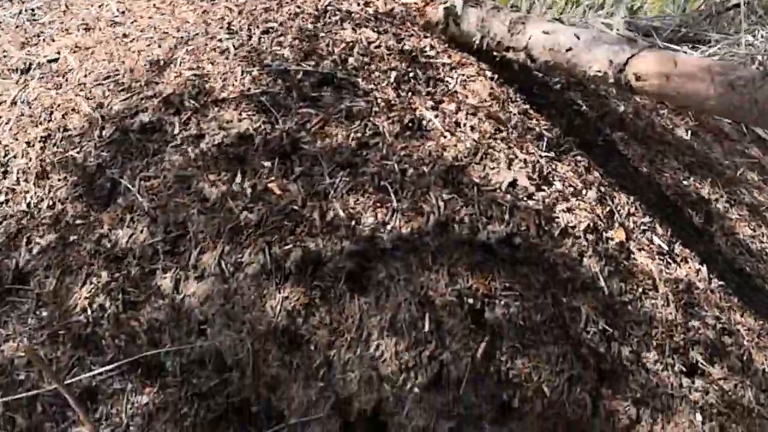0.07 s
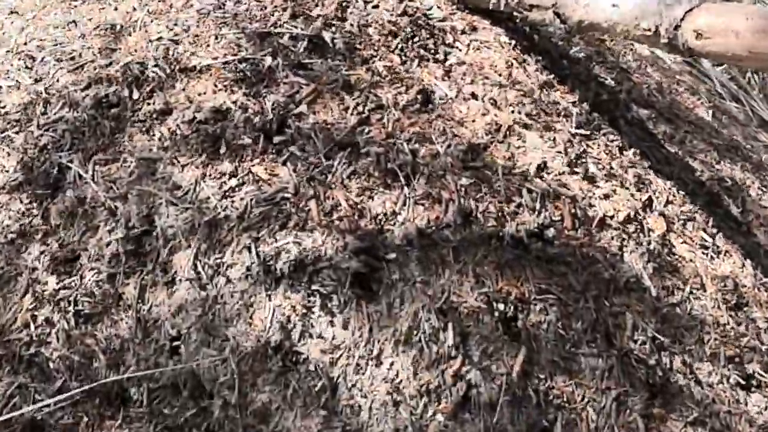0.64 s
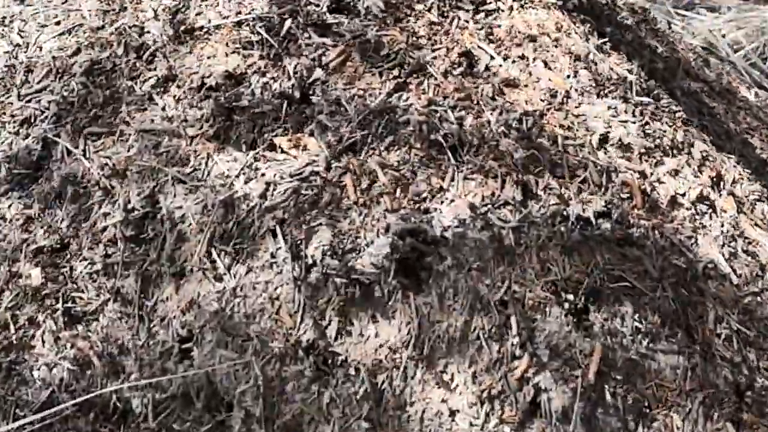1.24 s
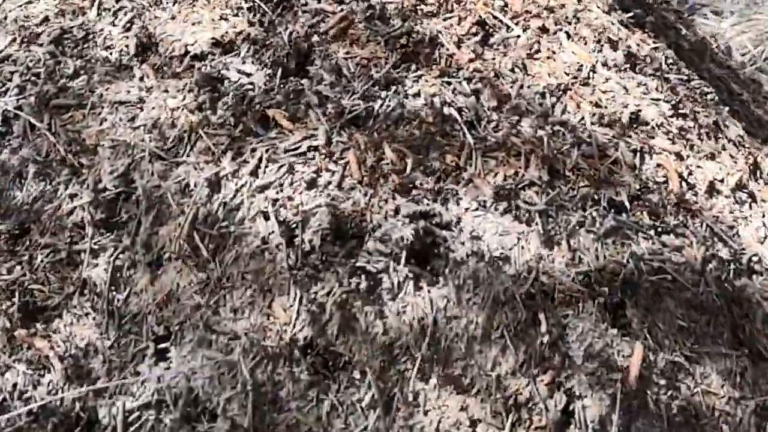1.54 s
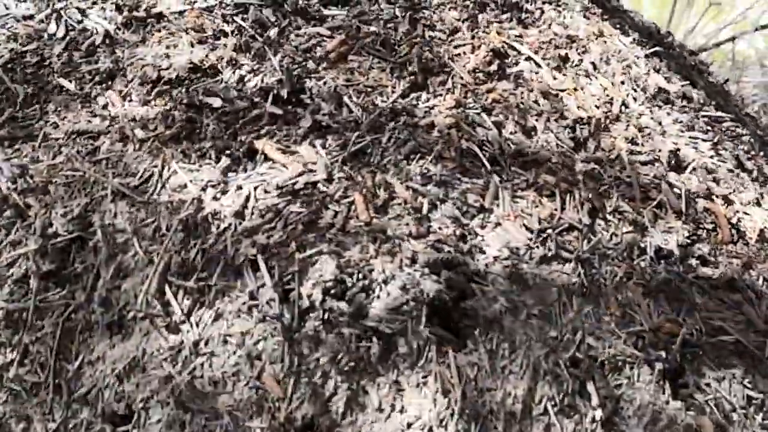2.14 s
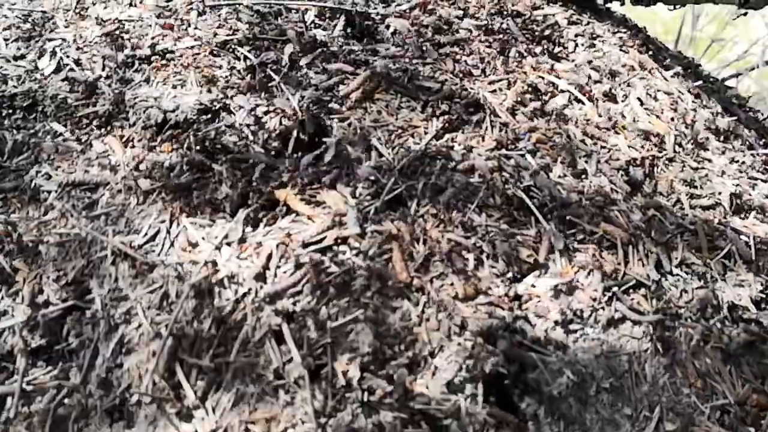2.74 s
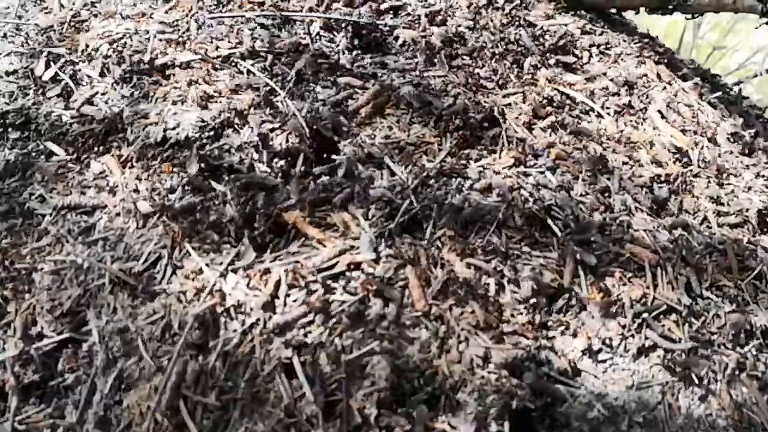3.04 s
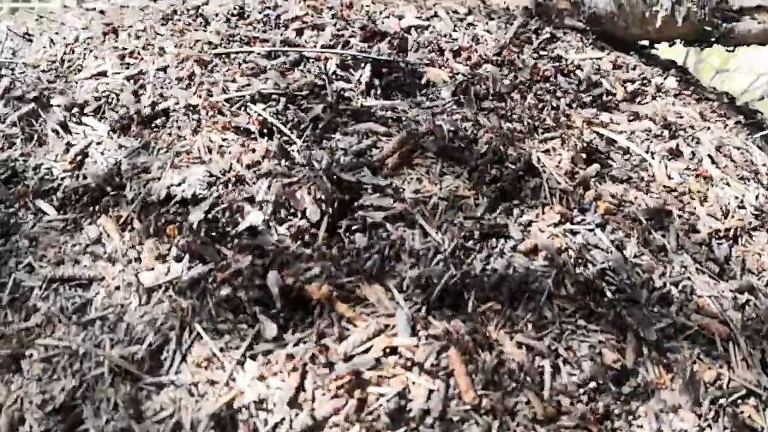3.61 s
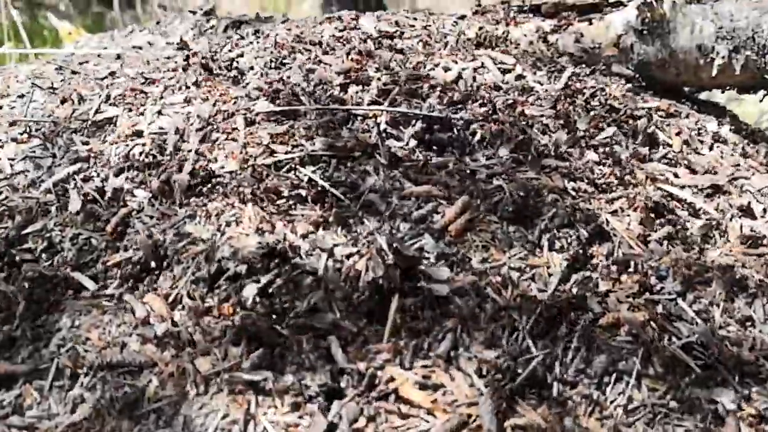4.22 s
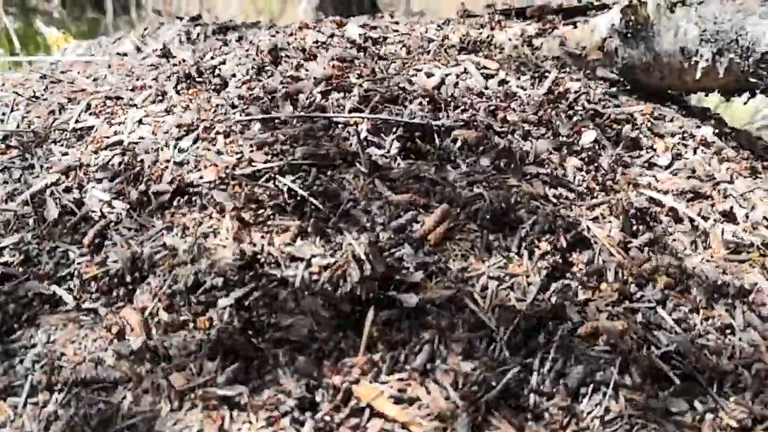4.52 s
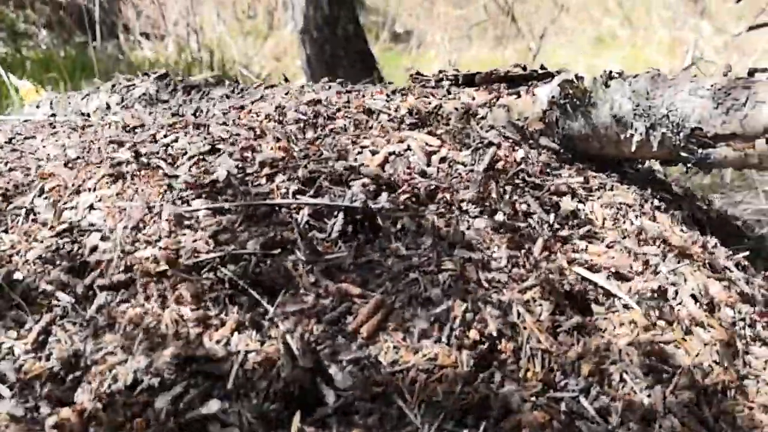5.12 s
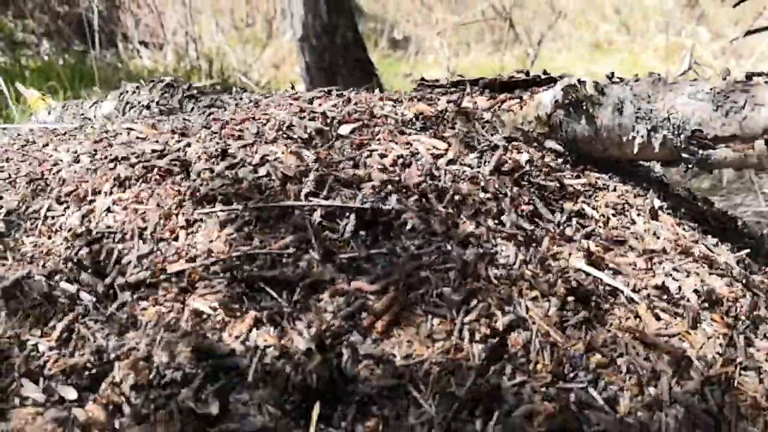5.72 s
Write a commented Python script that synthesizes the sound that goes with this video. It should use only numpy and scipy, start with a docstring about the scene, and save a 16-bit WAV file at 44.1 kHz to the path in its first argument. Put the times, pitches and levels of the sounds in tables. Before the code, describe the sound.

A soft gust rushes through forest treetops and slowly dies away. Close by, dry needles and bark crunch faintly in short bursts and thin twigs snap as weight shifts on the ground, mostly in the first half. One sharper crack comes later. The hand-held microphone adds a low rumble and soft finger bumps that cluster towards the end, over a steady distant hush.

```python
"""A gust rushes through forest tree crowns and dies away, heard on a hand-held two-port microphone
moving slowly over an anthill. Thin twigs snap and ring, and dry needles and bark crunch in short
bursts as weight shifts on the litter. The hand on the casing adds a low rumble, and slipping fingers
make soft bumps that cluster towards the end. The distant forest hushes underneath."""
import sys
import numpy as np
from scipy import signal
from scipy.fft import rfft, irfft
from scipy.io import wavfile
from scipy.ndimage import uniform_filter1d, map_coordinates

SR = 44100
rng = np.random.default_rng(int(sys.argv[2]) if len(sys.argv) > 2 else 0)


def unload_audio(sound):
    """Save the sound as a 16-bit wav file, at the path given as the first command line argument."""
    columns = np.transpose(np.atleast_2d(sound))
    # keep every value between -1 and 1, then stretch to whole-number steps
    steps = np.round(np.clip(columns, -1, 1) * 32767)
    wavfile.write(sys.argv[1], SR, steps.astype(np.int16))


N = 254016
TIME = np.arange(N) / SR
FREQ = np.maximum(np.arange(N // 2 + 1) * SR / N, 1)
TOP_HZ = 15700

# Finger slips on the casing. Each row: start in s, length in s, level in dB, contact time in ms.
FINGER_SLIPS = [(0.546, 0.011, -19.5, 5.9), (0.627, 0.035, -21.5, 2.54), (1.045, 0.0084, -26, 3.3),
                (1.461, .005, -20, 2.9), (1.68, 0.007, -22.5, 4.7), (1.857, 0.0046, -23.5, 4.2),
                (2.12, .05, -26.5, 2.5), (2.344, .006, -24.5, 4.2), (2.698, 0.059, -21, 3.9),
                (2.777, 0.044, -17, 2.26), (2.846, 0.042, -19, 3), (3.01, 0.014, -21, 3.2),
                (4.516, 0.021, -16, 4.7), (4.569, .01, -16, 3.5), (4.656, 0.0077, -18, 4.2),
                (4.711, .01, -15, 1.34), (4.755, 0.022, -23, 4.3), (4.885, 0.037, -15.5, 1.86),
                (5.013, 0.038, -16, 3.2), (5.076, 0.019, -13, 2.6), (5.346, .01, -17, 1.4),
                (5.369, 0.088, -25.5, 3.5), (5.493, 0.04, -13.5, 1.77), (5.599, .055, -15, 2.3)]


def wind(flutter_db=1.26, gain_db=1.0, lag_ms=.58):
    """Air rushes through the crowns all around; the nearest trees reach the left port first."""
    # Dying gust. Each row: time in s, level in dB, left minus right in dB.
    gust = [(0.0, -36.5, -2.5), (0.58, -40, -3), (1.07, -38, -4.5), (1.32, -36.5, -5), (1.52, -40.5, -5.5),
            (1.56, -38.5, -4.0), (2.23, -39.5, -4.5), (2.73, -42, -6.5), (2.82, -46, -4.5),
            (2.92, -43, -6.5), (3.27, -42.5, -4), (3.87, -49, -3), (5.29, -45.5, -1.5), (5.7, -51.5, -5.5),
            (5.76, -48.5, -10)]
    # Its passage through the nearest trees. Each row: time in s, level over the other crowns in dB.
    near_share = [(0, -6.5), (0.9, 0), (1.3, 3), (2.4, 3.5), (4.5, -4.5), (5.76, -10)]
    # Spectra of the nearest trees and the crowns around. Each row: frequency in Hz, gain in dB.
    near_spectrum = [(500, -22), (800, -11), (1200, -1.5), (1520, -0.5), (1850, -3), (2300, -11.5),
                     (3100, -29.5)]
    crown_spectrum = [(400, -22.5), (560, -13.5), (700, -7), (850, 1), (1050, -0.5), (1300, -3.5),
                      (1550, -3), (1900, -1.5), (2300, -6.5), (2700, -13), (3100, -26.5), (4000, -34)]
    level_db, pan_db = curves(gust)
    near_db, = curves(near_share)
    left = colour(rng.standard_normal(N), near_spectrum)
    right = map_coordinates(left, [np.arange(N) - lag_ms * SR / 1000], order=3, mode="reflect")
    near = unit(np.array([left, right])) * undb(near_db + flutter_db * walk(11.0))
    around = unit(colour(diffuse(), crown_spectrum)) * undb(flutter_db * walk(6.05))
    blend = (near + around) / np.hypot(1, undb(near_db))
    return blend * undb(level_db + gain_db) * pan(pan_db)


def twig_snaps(crack_db=7.0, splinter_db=-22, splinter_s=0.00063,
               ground_db=-42, ground_s=0.015, ring_db=-12):
    """A twig gives with one sharp crack, splinters and rings; the ground scatters a faint tail."""
    # Snaps. Each row: time in s, level in dB, ring offset in dB, pitch in Hz, left minus right in dB.
    snaps = [(0.3681, -30, -5, 7800, -6), (0.5233, -26.5, -10, 5200, -6), (0.9752, -43, 5, 5400, -3),
             (1.131, -44, 6, 4700, -6), (1.297, -30.5, -4, 8800, -11), (1.5822, -28, 7.5, 5000, -4),
             (1.7424, -28, -3, 4800, 0), (1.8228, -26.5, -6, 6630, -1), (2.0362, -25, -8, 8600, -5),
             (2.2414, -31, 0, 3220, -4), (2.6321, -27, -14, 7800, 2), (2.749, -19, -3, 13630, -1),
             (2.752, -17, -11, 8600, 2), (2.9167, -26, -12, 5430, -5), (2.9572, -28.5, 2, 6950, -2),
             (2.9986, -23.5, 3, 4540, 4), (3.0017, -20.5, -4, 4520, -16), (3.0453, -32, 1, 5570, 0),
             (3.273, -37, -9, 9500, 2), (3.3802, -40, -8, 13800, 0), (3.501, -39, -12, 7000, 0),
             (4.3034, -8.5, -23, 2280, 7), (4.4452, -38, -10, 7000, 4)]
    # Twig modes. Each row: multiple of the pitch, T60 in s, level in dB.
    modes = [(.72, 0.0054, 0.5), (1, 0.0091, 3), (1.16, 0.0036, 1), (2.05, 0.0054, -6)]
    # Crack spectrum. Each row: frequency in Hz, gain in dB.
    crack_spectrum = [(1200, -19), (2200, -7.5), (4000, -14), (6300, -16), (7600, -8.5), (9400, 1.5),
                      (10800, -3), (12000, -8), (14500, -15), (16000, -19)]
    cracks, rings = np.zeros((2, 2, N))
    t = TIME[:SR // 15]
    splinters = undb(splinter_db) * (t / splinter_s) * np.exp(1 - t / splinter_s)
    tail = splinters + undb(ground_db) * np.exp(-t / ground_s)
    for s, db, wood_db, hz, pan_db in snaps + small_twigs():
        crack = rng.standard_normal((2, len(t))) * tail
        crack[0, 0] = 1
        crack[1, max(int(pan_db // 2), 0)] = 1  # a twig on the left reaches the right port later
        ring = sum(undb(mode_db - 60 * t / t60_s)
                   * np.sin(2 * np.pi * (hz * multiple * t + rng.random((2, 1))))
                   for multiple, t60_s, mode_db in modes if hz * multiple < TOP_HZ)
        add(cracks, s, crack * undb(db + crack_db) * pan(pan_db))
        add(rings, s, ring * undb(db + wood_db + ring_db) * pan(pan_db))
    return colour(cracks, crack_spectrum) + rings


def small_twigs(count=14, over_load_db=18, scatter_db=2, wood_db=-4,
                ring_hz=6200, spread_octaves=0.39, pan_db=-1.5, pan_spread_db=3):
    """Thin twigs give at random, more often and louder under load; returns snap rows."""
    load_db = litter_load_db()
    summed_load = np.cumsum(undb(load_db / 2))
    times = np.interp(rng.random(count), summed_load / summed_load[-1], TIME)
    rows = []
    for s, (size, pitch, place) in zip(times, rng.standard_normal((count, 3))):
        db = np.interp(s, TIME, load_db) + over_load_db + scatter_db * size
        hz = ring_hz * 2 ** (spread_octaves * pitch)
        rows.append((s, db, wood_db, hz, pan_db + pan_spread_db * place))
    return rows


def litter_crunch(max_breaks_per_s=3000, spread_db=5.0, max_stalks_per_s=260, stalk_spread_db=6.0,
                  stalk_db=-3, grain_s=0.0015, gain_db=1.5):
    """Dry fragments break in one band per size, stalks in all bands; load makes more and louder breaks."""
    # Fragment sizes. Each row: band centre in Hz, width in octaves, level in dB.
    fragments = [(3360, 0.21, -1), (4940, 0.34, -2.5), (7920, 0.22, 0.5), (9250, 0.12, 3),
                 (11000, 0.13, -6), (13700, 0.13, -9.5)]
    load_db = litter_load_db()
    activity = undb((load_db - load_db.max()) / 4) / SR
    stalks = breaks(max_stalks_per_s * activity, stalk_spread_db) * undb(stalk_db) ** 2
    spectrum = 0
    for hz, octaves, db in fragments:
        impulses = breaks(max_breaks_per_s * activity, spread_db) + stalks + 1e-18
        energy = signal.lfilter([1], [1, -np.exp(-1 / (grain_s * SR))], impulses)
        grains = rng.standard_normal((2, N)) * np.sqrt(energy)  # one tiny noise burst per break
        band = np.exp(-(np.log2(FREQ / hz) / octaves) ** 2 / 2)
        spectrum = spectrum + rfft(grains) * undb(db) * band
    return unit(irfft(spectrum, N)) * undb(load_db + gain_db)


def breaks(chance, spread_db):
    """Energy of random breaks, mostly tiny, now and then large; mean 1."""
    hits = rng.random(N) < chance
    size = undb(spread_db * np.minimum(rng.exponential(size=N), 5))
    energy = hits * size ** 2 / chance
    return energy / energy.mean()


def litter_load_db(attack_s=0.049, release_s=0.027, settle_db=-10, settle_s=.3):
    """Each press builds, holds and lets go, then the litter settles."""
    # Presses of weight on the litter. Each row: start in s, length in s, level in dB.
    presses = [(0.298, .18, -56.5), (0.551, 0.064, -58.5), (0.718, 0.036, -65), (0.894, 0.22, -63),
               (1.253, 0.088, -57.5), (1.588, .16, -53.5), (1.841, .05, -56.5), (2.01, 0.037, -62.5),
               (2.153, .1, -54.5), (2.523, 0.13, -56), (2.735, .07, -55.5), (2.909, .13, -53),
               (3.098, 0.023, -59), (3.522, .12, -67), (4.022, .22, -66)]
    power = 0
    for s, length_s, db in presses:
        press = swell(s, length_s, attack_s, release_s)
        settling = undb(settle_db) * swell(s, length_s, attack_s, settle_s)
        power = power + undb(db) ** 2 * (press ** 2 + settling ** 2)
    return 10 * np.log10(power)


def finger_bumps(push_db=4.5, casing_hz=72, casing_q=0.95, scuff_db=-19, scuff_s=0.012, lag_s=.0009):
    """A soft push rebounds in the casing with a dull scuff of skin; it reaches the left port late."""
    # Spectrum of skin on the casing. Each row: frequency in Hz, gain in dB.
    scuff_spectrum = [(110, -7), (200, 2), (290, -6.5), (460, -14)]
    pushes, contact = np.zeros((2, N))
    t = TIME[:SR // 12] - 1 / 25  # zero at the centre of the push
    for s, db, contact_ms in stick_slip():
        add(pushes, s + t[0], undb(db + push_db) / np.cosh(2 * t * 1000 / contact_ms))
        add(contact, s + t[0], undb(db + scuff_db) * (3 / contact_ms) * np.exp(-(t / scuff_s) ** 2))
    w = 1j * FREQ / casing_hz
    rebound = rfft(pushes) * w ** 2 / (w ** 2 + w / casing_q + 1)  # resonant high-pass
    scuff = rfft(contact * unit(colour(rng.standard_normal(N), scuff_spectrum)))
    lowpass_hz = scuff_spectrum[-1][0]
    right = (rebound + scuff) / np.sqrt(1 + (FREQ / lowpass_hz) ** 8)
    left = right * np.exp(-2j * np.pi * FREQ * lag_s)
    return irfft(np.array([left, right]), N)


def stick_slip(max_bumps=8, gap_s=.02, jitter=.12, scatter_db=1.5):
    """A slipping finger catches repeatedly. Each row: time in s, level in dB, contact time in ms."""
    rows = []
    for start_s, length_s, db, contact_ms in FINGER_SLIPS:
        s = start_s
        for gap, size in rng.standard_normal((max_bumps, 2)):
            if s <= start_s + length_s:
                rows.append((s, db + scatter_db * size, contact_ms))
            s += gap_s * np.exp(jitter * gap)
    return rows


def grip_rumble(slip_db=-14, attack_s=0.039, release_s=0.041, uneven_db=0.5, side_db=-12, side_hz=110):
    """The grip rumbles, more around each slip; the casing moves whole in deep bass, flexes higher up."""
    # Hand at rest on the casing. Each row: time in s, level in dB.
    hold = [(0, -42), (2.9, -38.5), (3.4, -46.5), (4.2, -43), (5.76, -36)]
    # Casing spectrum. Each row: frequency in Hz, gain in dB.
    casing_spectrum = [(20, -14.5), (45, 1), (75, 1), (130, -4.5), (200, -13.5), (290, -25), (400, -34)]
    hold_db, = curves(hold)
    slip_power = sum((undb(db + slip_db) * swell(s, length_s, attack_s, release_s)) ** 2
                     for s, length_s, db, _ in FINGER_SLIPS)
    envelope = np.sqrt(undb(hold_db) ** 2 + slip_power)
    mid, side = unit(colour(rng.standard_normal((2, N)), casing_spectrum))
    side = irfft(rfft(side) * np.minimum(FREQ / side_hz, 3), N) * undb(side_db)
    return np.array([mid + side, mid - side]) * envelope * undb(uneven_db * walk(24.45))


def forest_hush(level_db=-47, sway_db=.4):
    """Steady hush of the distant forest, swaying very slightly."""
    # Still-air spectrum. Each row: frequency in Hz, gain in dB.
    hush_spectrum = [(88, -25), (150, -4.5), (217, -5.5), (414, -15), (578, -14.5), (821, -6.5),
                     (1060, -6.5), (1310, -16), (1870, -9), (3100, -22), (3920, -23.5), (4580, -30),
                     (9260, -39), (14500, -51), (16000, -67)]
    envelope = undb(level_db + sway_db * walk(3))
    return unit(colour(diffuse(), hush_spectrum)) * envelope


def diffuse(port_gap_m=0.32):
    """White noise from all sides at two spaced ports: alike in the bass, unrelated in the treble."""
    coherence = np.sinc(2 * FREQ * port_gap_m / 343)
    mid, side = rfft(rng.standard_normal((2, N))) * np.sqrt([1 + coherence, 1 - coherence])
    return unit(irfft(np.array([mid + side, mid - side]), N))


def colour(x, points):
    """Minimum-phase filter with the given spectrum, falling 24 dB per octave just beyond its ends."""
    octaves_outside = np.abs(np.log2(FREQ / np.clip(FREQ, points[0][0], points[-1][0])))
    gain_db = spectrum_db(points) - 24 * np.minimum(octaves_outside, 3)
    cepstrum = irfft(np.log(undb(gain_db)), N)
    cepstrum[1:N // 2] *= 2
    cepstrum[N // 2 + 1:] = 0
    return irfft(rfft(x) * np.exp(rfft(cepstrum)), N)


def spectrum_db(points):
    """(Hz, dB) points interpolated over log frequency."""
    hz, db = np.transpose(points)
    return np.interp(np.log(FREQ), np.log(hz), db)


def curves(table):
    """Each column after the time as a value per sample."""
    s, *columns = np.transpose(table)
    return [np.interp(TIME, s, column) for column in columns]


def swell(start_s, length_s, attack_s, release_s):
    """Envelope that rises towards its start, holds at 1 and dies away."""
    rise = np.minimum(TIME - start_s, 0) / attack_s
    fall = np.maximum(TIME - start_s - length_s, 0) / release_s
    return np.exp(np.maximum(rise - fall, -20))


def walk(rate_hz):
    """Random steps, smoothed twice; rms 1."""
    width = int(SR / rate_hz)
    steps = np.repeat(rng.standard_normal(N // width + 1), width)
    return unit(uniform_filter1d(uniform_filter1d(steps, width), width)[:N])


def add(track, s, sound):
    """Mix a sound into a track at time s."""
    start = max(int(s * SR), 0)
    track[..., start:start + sound.shape[-1]] += sound[..., :N - start]


def pan(db):
    """Left and right gains for a level difference."""
    return undb(np.array([db, -db]).reshape(2, -1) / 2)


def undb(db):
    """Decibels to gain."""
    return 10 ** (np.asarray(db) / 20)


def unit(x):
    """Scale to rms 1."""
    return x / np.sqrt(np.mean(x ** 2))


def scene():
    """Forest air, litter and twigs at the two ports, plus the hand on the casing."""
    # Treble imbalance of the ports. Each row: frequency in Hz, left minus right in dB.
    port_balance = [(200, 0), (1300, 0), (2200, -2), (3100, 2), (4000, -4), (6000, 4), (7200, -2.5),
                    (8700, -3), (10000, 0.5), (13000, 2)]
    forest = wind() + forest_hush() + litter_crunch()
    at_ports = irfft(rfft(forest) * pan(spectrum_db(port_balance)), N)
    return at_ports + twig_snaps() + grip_rumble() + finger_bumps()


def record(dry):
    """Steep low-pass at TOP_HZ."""
    return signal.sosfilt(signal.ellip(8, .2, 70, TOP_HZ, fs=SR, output="sos"), dry)


dry = scene()
out = record(dry)
unload_audio(out)
```